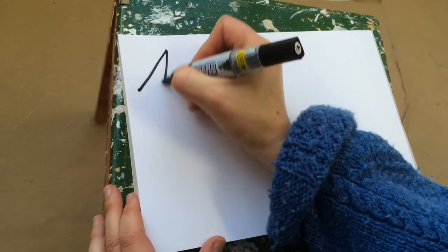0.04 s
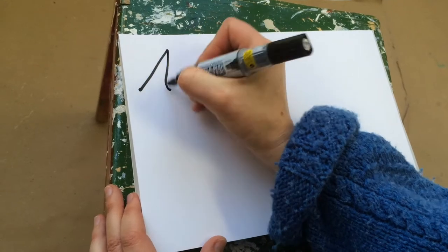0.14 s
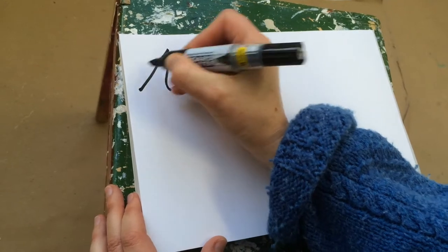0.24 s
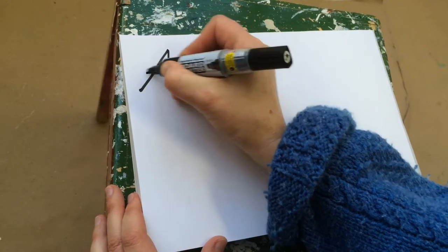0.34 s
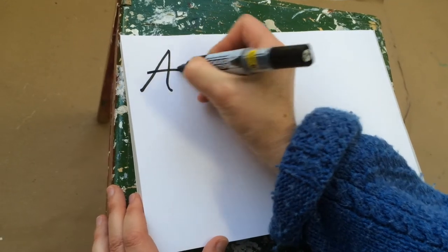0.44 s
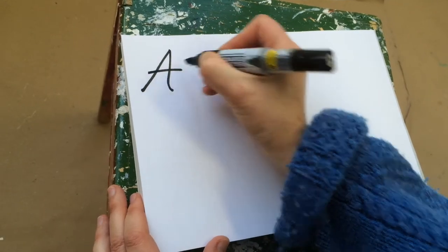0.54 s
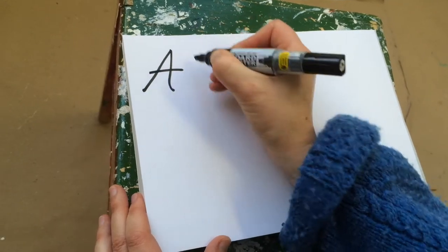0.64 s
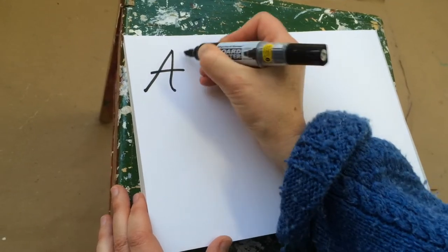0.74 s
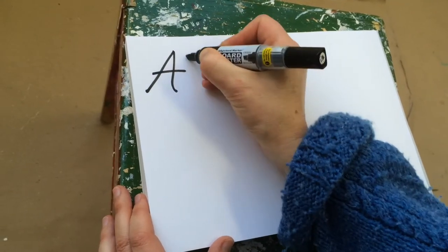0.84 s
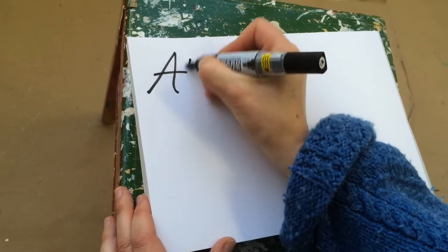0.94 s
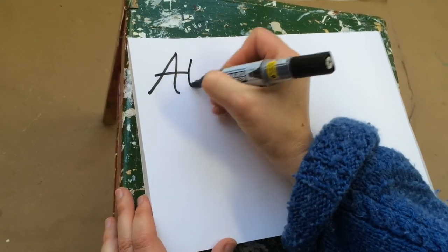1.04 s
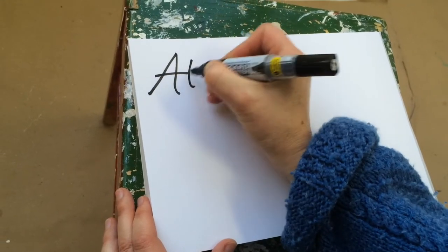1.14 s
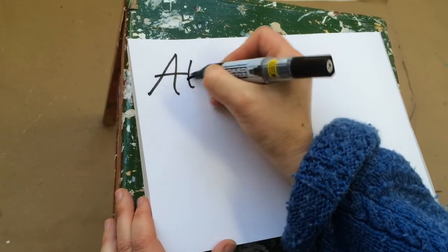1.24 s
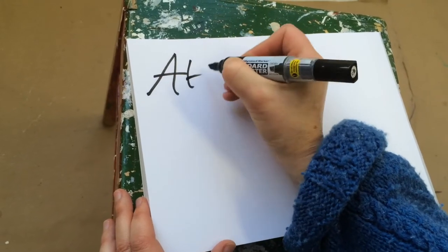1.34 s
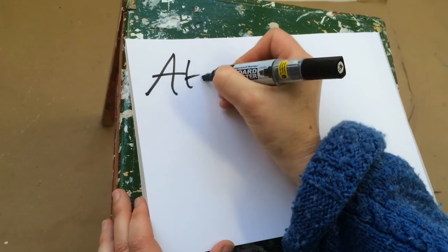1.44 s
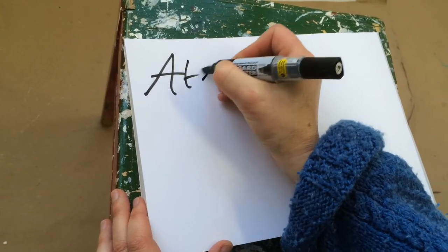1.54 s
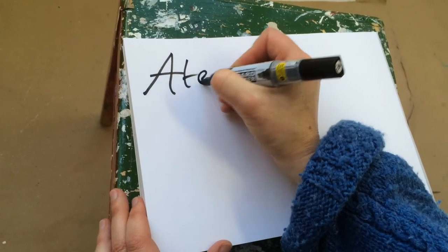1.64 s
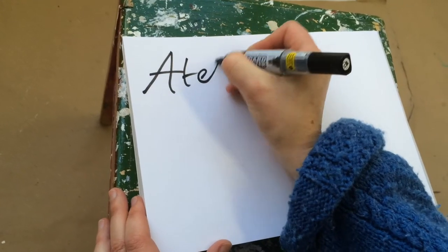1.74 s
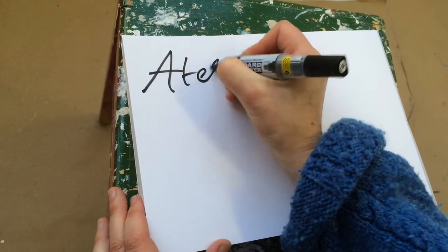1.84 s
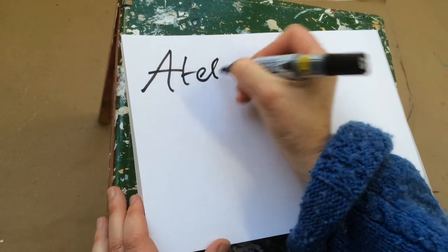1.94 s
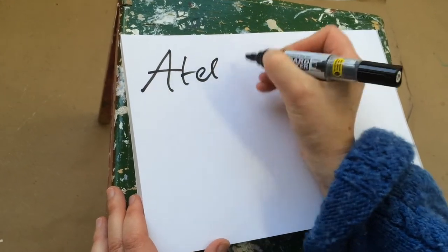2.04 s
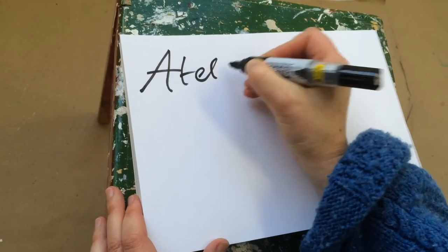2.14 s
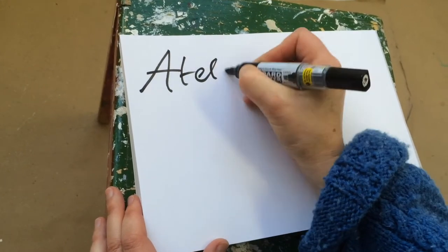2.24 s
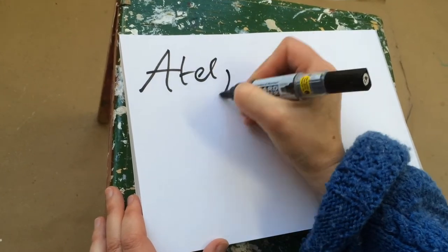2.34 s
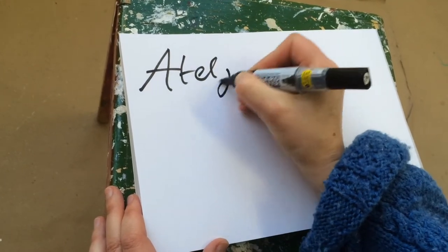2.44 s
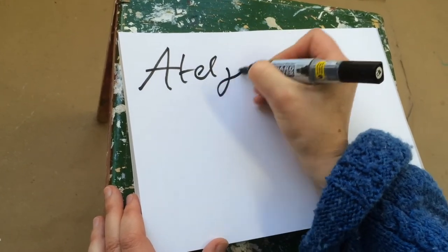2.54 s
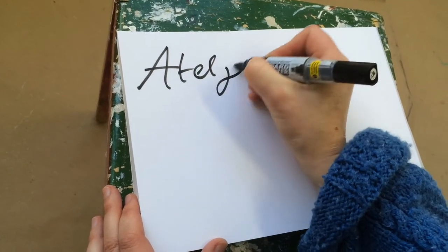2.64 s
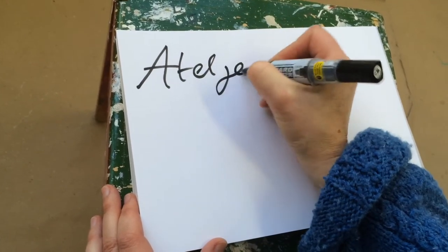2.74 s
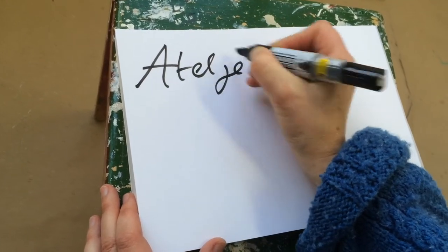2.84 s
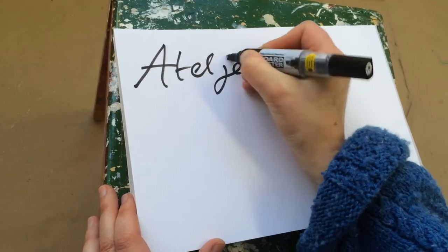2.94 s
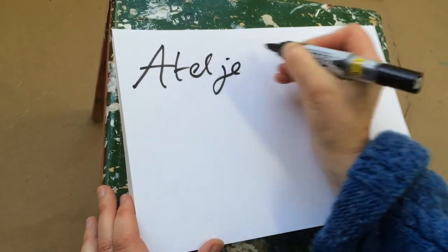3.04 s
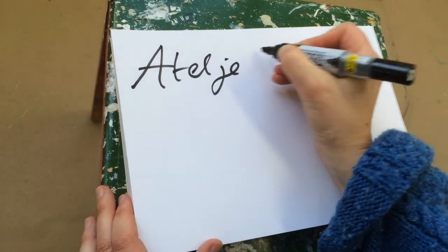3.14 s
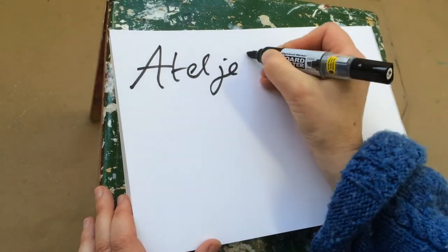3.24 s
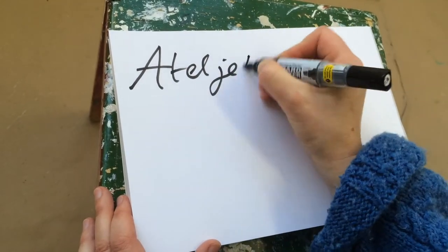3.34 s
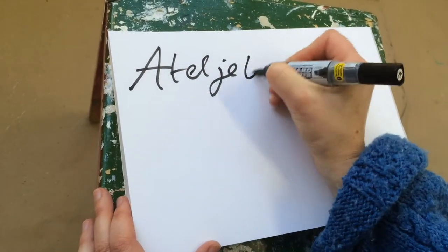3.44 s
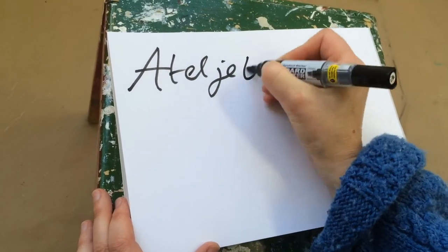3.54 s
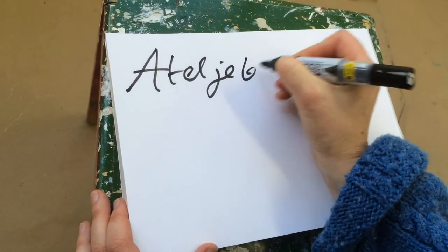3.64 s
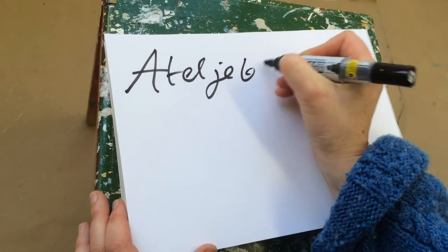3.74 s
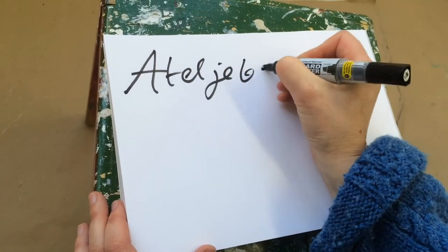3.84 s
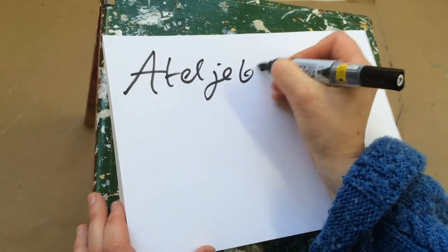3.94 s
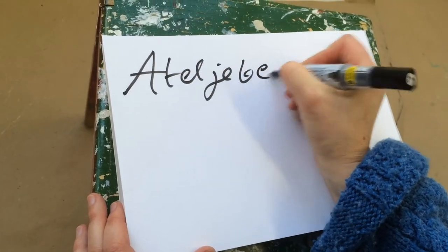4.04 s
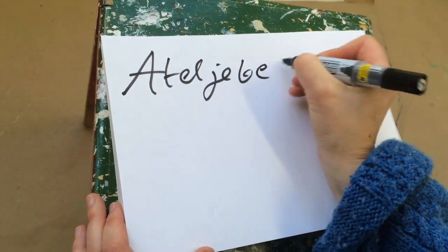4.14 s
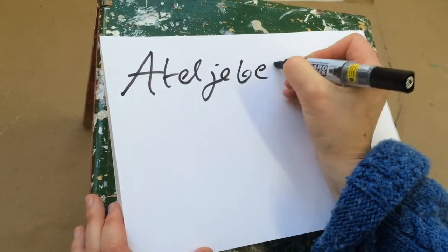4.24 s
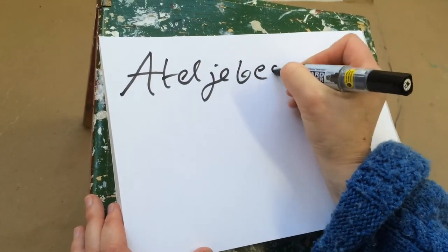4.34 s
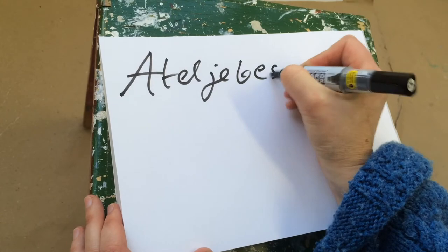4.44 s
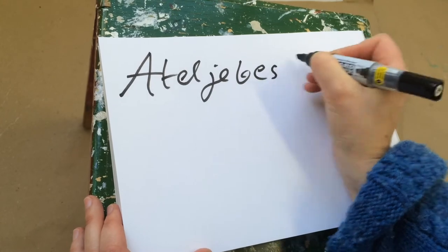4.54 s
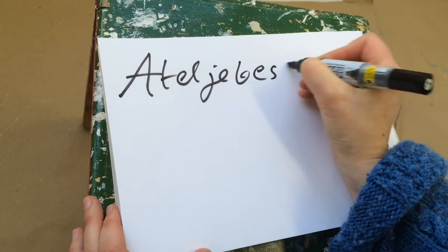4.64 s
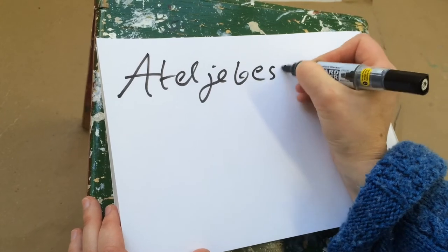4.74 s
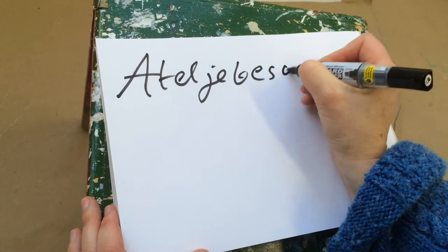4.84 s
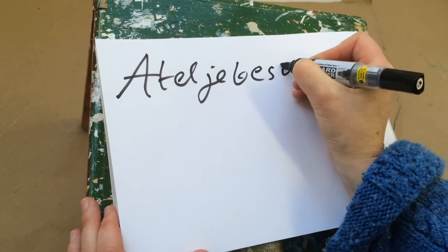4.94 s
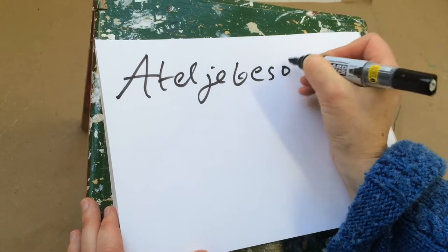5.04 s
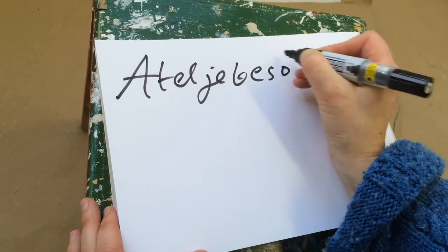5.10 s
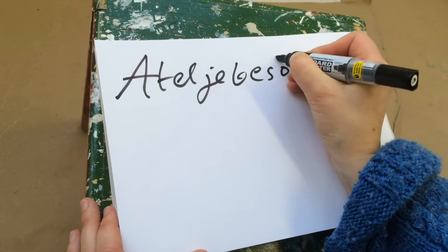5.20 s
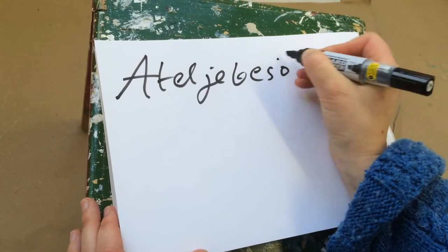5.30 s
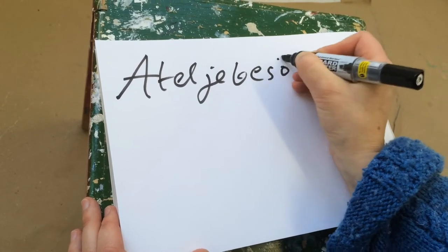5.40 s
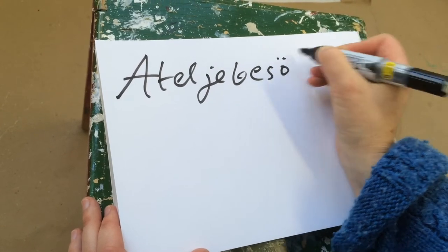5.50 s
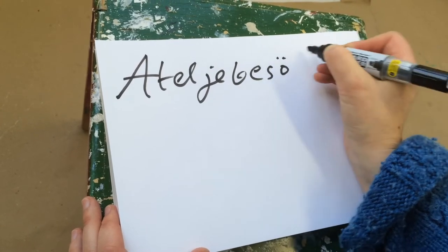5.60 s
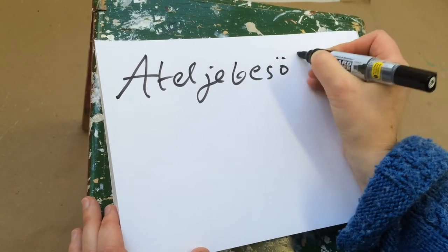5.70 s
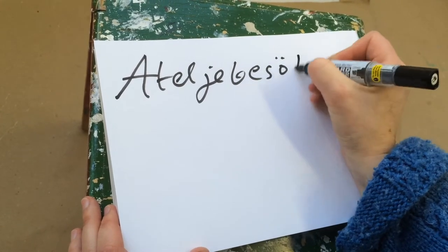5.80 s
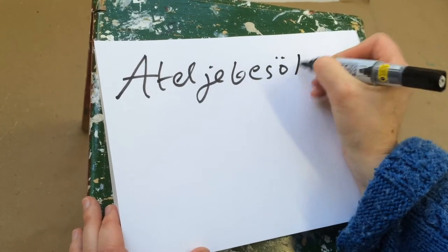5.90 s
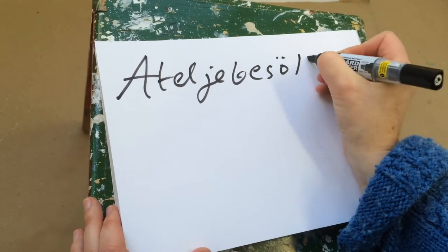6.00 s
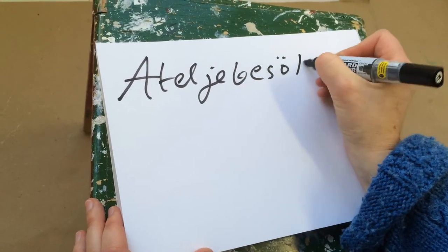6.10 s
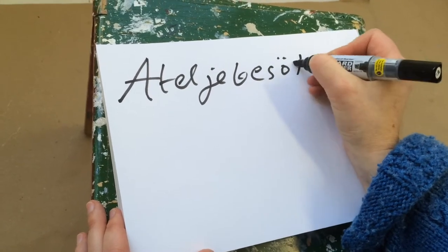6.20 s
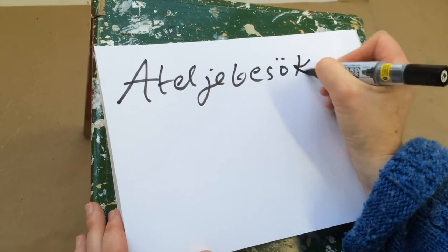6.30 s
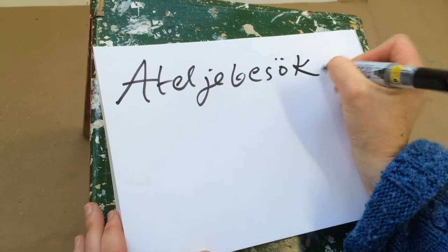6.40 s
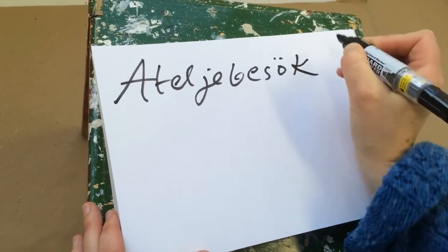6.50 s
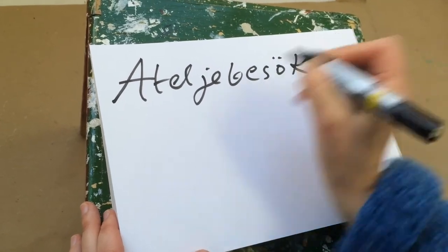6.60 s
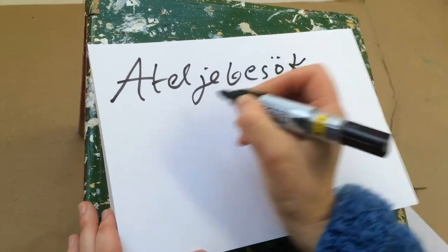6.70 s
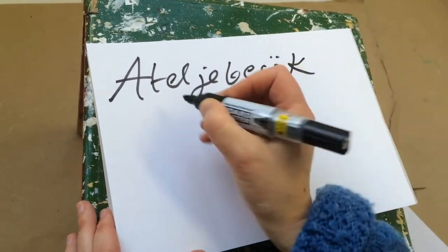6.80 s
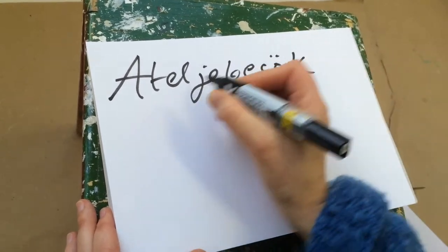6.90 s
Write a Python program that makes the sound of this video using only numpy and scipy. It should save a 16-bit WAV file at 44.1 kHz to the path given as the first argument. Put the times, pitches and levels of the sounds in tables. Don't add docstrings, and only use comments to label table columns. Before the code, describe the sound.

In a quiet room, a felt-tip marker writes letters one by one on paper laid over a hollow wooden board. Short, fluttering, squeaky scratches alternate with brief gaps where the hand brushes softly across the sheet. The tip lands with dull little knocks, the hardest near the middle, and the paper snaps now and then. The writing stops near the end, leaving faint ticks. Close small microphone, thin bass, slight room tail.

```python
import sys
import numpy as np
from scipy import signal
from scipy.fft import rfft, irfft
from scipy.io import wavfile

SR = 44100
rng = np.random.default_rng(int(sys.argv[2]) if len(sys.argv) > 2 else 0)


def undo_db(level):
    steps = np.asarray(level, float) / 20
    return 10 ** steps


def store_wav(level_fs):
    pcm = np.round(np.clip(np.atleast_2d(level_fs), -1, 1) * 32767)
    wavfile.write(sys.argv[1], SR, pcm.T.astype(np.int16))


N = 306936
CONTROL_STEP = 32


def rms_one(x):
    return x / np.sqrt(np.mean(x ** 2) + 1e-20)


def drift(rate):
    r = np.exp(-80 * np.pi * rate / SR)
    noise = rng.standard_normal(N // 40 + 2002)
    slow = signal.lfilter([1], [1, -2 * r, r * r], noise)[2000:]
    return np.interp(np.arange(N) / 40, np.arange(len(slow)), rms_one(slow))


def band(x, low_hz, high_hz):
    return signal.sosfilt(signal.butter(2, [low_hz, high_hz], "band", fs=SR, output="sos"), x)


def coloured(spectrum):
    hz, level_db = np.transpose(spectrum)
    grid = np.maximum(np.fft.rfftfreq(N, 1 / SR), 1)
    gain = undo_db(np.interp(np.log(grid), np.log(hz), level_db))
    return rms_one(irfft(rfft(rng.standard_normal(N)) * gain, N))


def resonate(x, hz, width_hz):
    r = np.exp(-np.pi * width_hz / SR)
    feedback = [1, -2 * r * np.cos(2 * np.pi * hz / SR), r * r]
    return signal.lfilter(np.array([1, 0, -1]) * (1 - r * r) / 2, feedback, x)


def smooth(coarse):
    return np.interp(np.arange(N) / CONTROL_STEP, np.arange(len(coarse)), coarse)


def swells(rows, steep=2):
    s, db, half_width, *extras = np.transpose(rows)[:, :, None]
    t = np.arange(0, N + CONTROL_STEP, CONTROL_STEP) / SR
    bells = undo_db(db) * np.exp(-np.abs((t - s) / half_width) ** steep) + 1e-9
    weight = bells ** 2
    return bells, *[smooth((weight * extra).sum(0) / weight.sum(0)) for extra in extras]


def still_air():
    # hz, level_db (per Hz)
    air_colour = [(15, -39), (25, -39), (55, -23), (82, 15), (156, -4), (378, 1), (741, -1), (1300, -3),
                  (4260, -12.5), (9550, -13), (15500, -15)]
    return undo_db(-69.5) * coloured(air_colour)


def board_rumble():
    # time_s, level_db
    weight = [(0.0, -69), (1.26, -69), (1.47, -62.5), (2.201, -69), (2.46, -64), (2.77, -67.5), (2.98, -62),
              (3.6, -68.5), (4.36, -66.5), (4.75, -71), (4.88, -66), (5.271, -74), (5.42, -55),
              (5.93, -65.5), (6.96, -73)]
    # hz, level_db (per Hz)
    rumble_colour = [(18, -52), (30, -6), (81, 0), (119, -12.5), (184, -10), (298, -16), (351, -12.5),
                     (625, -40), (800, -26.5), (1040, -41), (1760, -120)]
    level_db = np.interp(np.arange(N) / SR, *np.transpose(weight))
    return undo_db(level_db + 0.57 * drift(3.6)) * coloured(rumble_colour)


def tip_motion():
    # start_s, length_s
    contacts = [(.006, .24), (0.425, 0.15), (.996, .14), (1.297, 0.087), (1.511, 0.35), (1.864, .19),
                (2.318, .5), (3.019, 0.051), (3.381, 0.28), (3.577, 0.1), (3.889, 0.32), (4.256, 0.019),
                (4.312, 0.17), (4.712, 0.045), (4.776, 0.2246), (5.032, .046), (5.3, .008), (5.435, .029),
                (5.483, 0.019), (5.789, .19), (6.124, 0.17), (6.285, .17)]
    # time_s, scratch_db, half_width_s, slant_db, twist_db
    strokes = [(0.082, -44.5, 0.034, -1.9, -5), (0.144, -44.5, 0.033, -5.7, -4),
               (0.195, -58.5, 0.061, 1, -3), (0.446, -57.8, 0.02, 6, 0), (0.491, -49, 0.044, -4, -4),
               (0.517, -54.5, 0.029, -3, -7), (1.018, -47.5, 0.03, -1.5, 1),
               (1.025, -50.5, 0.094, -2.5, 0), (1.137, -65, 0.017, -7, 0), (1.309, -44, 0.027, 3, 1.5),
               (1.339, -52, 0.014, -14, -7), (1.882, -39.5, 0.031, 6, 2.5),
               (1.945, -51, 0.048, 0.2, -1), (2.015, -68.5, 0.091, -4, -4.5),
               (4.155, -64, 0.065, -1.5, -1), (5.845, -51, 0.052, -3.5, -2),
               (5.887, -58.5, 0.038, -6, 7), (6.128, -47.5, 0.036, 3, 6.5),
               (6.208, -45, 0.04, -1.5, 2.5), (6.355, -49, 0.053, -2.5, 0), (6.403, -47, 0.051, -4, 3),
               (6.438, -59, 0.009, 2, -3.5),
               (1.552, -45.5, 0.027, 0, 0), (1.649, -43, 0.039, 2, -1.5), (1.755, -44.5, 0.044, -2.6, 0),
             (1.837, -54.5, 0.024, -6, 4), (2.365, -50.5, 0.092, -0.8, 0), (2.438, -46, 0.038, 2.5, 1),
             (2.54, -45.5, 0.041, -5, -3), (2.616, -43.4, 0.038, -2.5, -0.5), (2.714, -43, 0.015, 2, 2.5),
             (2.765, -48, 0.14, 2, 1), (3.39, -51.5, 0.025, -2.3, 4), (3.43, -47.5, 0.026, -6, 0),
             (3.514, -43.5, 0.032, -5, 0), (3.611, -46, 0.026, -2, 6.5), (3.7, -47.5, 0.035, 0, 3.5),
             (3.934, -44.5, 0.025, 2.5, 4), (4.021, -44.5, 0.036, 0.4, 1.5), (4.096, -48.5, 0.024, -4, 0),
             (4.345, -51, 0.031, 7, 2.5), (4.418, -54, 0.063, 0, -2), (4.491, -44.5, 0.015, 1.7, 4),
             (4.78, -47, 0.058, 0.8, 0.5), (4.89, -42.5, 0.024, -1.4, -1.5), (5.004, -42, 0.064, 5.5, 0)]
    # time_s, scratch_db, half_width_s, slant_db, twist_db
    dabs = [
        (0.022, -64, 0.036, 14, -2),
        (3.022, -49, 0.011, -2, -2.5),
        (4.267, -51.5, 0.01, 6, -1.5),
        (4.721, -50, 0.014, 8, -4),
        (4.752, -59, 0.014, 21, -8),
        (5.056, -51.5, 0.0084, -26, -9),
        (5.308, -62, 0.0086, 2.5, 2),
        (5.439, -43.5, 0.0058, 15.5, 5.5),
        (5.5, -55, 0.01, -0.5, 2),
    ]
    break_loose_s, lift_s = 0.0057, 0.0039
    rows = strokes + dabs
    bells, slant_db, twist_db = swells(rows)
    start, length = np.transpose(contacts)[:, :, None]
    since = np.arange(bells.shape[1]) * CONTROL_STEP / SR - start
    touch = np.clip(since / break_loose_s, 0, 1) * np.exp(-np.maximum(since - length, 0) / lift_s)
    owner = np.searchsorted(start[:, 0] - .015, np.array(rows)[:, 0]) - 1
    return smooth((bells * touch[owner]).sum(0)), slant_db, twist_db


def slips(per_s, spread_db):
    sizes = undo_db(spread_db * np.minimum(rng.exponential(1, N), 4)) * rng.choice([-1, 1], N)
    return rms_one(sizes * (rng.random(N) < per_s / SR))


def body(drive, modes, wander_db, lean_db=0):
    lowest_hz = modes[0][0]
    shares = np.array([undo_db(db + wander_db * drift(8.7) - lean_db * np.log2(hz / lowest_hz))
                       for hz, width, db in modes])
    energy = sum(share ** 2 * width for share, (hz, width, db) in zip(shares, modes))
    shares = shares / np.sqrt(energy)
    out = np.zeros(N)
    for k, (hz, width, db) in enumerate(modes):
        out += (-1) ** k * shares[k] * resonate(drive, hz, width)
    return rms_one(out)


def hand_echo(x):
    echo_gain = .3
    lag = SR * (.00022 + .00004 * drift(2.5))
    echo = np.interp(np.arange(N) - lag, np.arange(N), x)
    return (x + echo_gain * echo) / np.sqrt(1 + echo_gain ** 2)


def marker():
    # pitch_hz, width_hz, level_db
    barrel_low = [(1000, 190, -6), (1294, 200, 1.5), (1600, 210, -2), (1952, 192, 0.5)]
    barrel_upper = [(2305, 466, -2.5), (2950, 470, -1.5), (3430, 240, 0), (3860, 343, -3)]
    barrel_mid = [(4510, 510, -2.5), (5090, 570, 2.5), (6400, 1220, -3.5)]
    tip_high = [(7090, 880, -8.5), (7850, 510, -0.5), (9230, 680, -2), (10200, 760, -1.5), (11150, 980, -5),
                (12300, 1340, -8.5), (14800, 1300, -7.5)]
    # pitch_hz, width_hz, level_db
    board_scrape = [(350, 46, 6), (513, 146, 3.5)]
    brisk_db, slowest_db = -44, -14.5

    gain, slant_db, twist_db = tip_motion()
    speed_db = np.maximum(20 * np.log10(gain + 1e-9) - brisk_db, slowest_db)

    def group_gain(when_brisk_db, per_speed_db, slant, twist, db_per_s):
        angle_db = slant * slant_db + twist * twist_db
        return undo_db(when_brisk_db + per_speed_db * speed_db + angle_db + db_per_s * np.arange(N) / SR)

    low = group_gain(-13.5, per_speed_db=-0.7, slant=1.256, twist=-0.5, db_per_s=1.43)
    upper = group_gain(0.89, per_speed_db=-0.17, slant=0.59, twist=0.34, db_per_s=-0.17)
    bright = group_gain(5, per_speed_db=0.27, slant=-0.24, twist=0.34, db_per_s=-0.7)

    drive = slips(per_s=14000, spread_db=2.2) * undo_db(.7 * drift(40.0))
    tones = low * body(band(drive, 660, 2470), barrel_low, wander_db=2.9, lean_db=-.5 * twist_db)
    upper_lean_db = 1.0 * slant_db + 0.82 * twist_db
    tones = tones + upper * body(band(drive, 1670, 5460), barrel_upper, wander_db=2.1, lean_db=upper_lean_db)
    mid_lean_db = 0.13 * slant_db + 0.41 * twist_db
    tones = tones + body(band(drive, 3200, 7600), barrel_mid, wander_db=2.4, lean_db=mid_lean_db)
    tip_lean_db = 0.95 * twist_db + 0.29 * slant_db
    tones = tones - bright * body(band(drive, 4500, 13400), tip_high, wander_db=1.17, lean_db=tip_lean_db)
    tones = tones - 0.077 * resonate(tones, 11300, 410)
    tones = tones + undo_db(-10.5) * low * body(band(drive, 140, 1800), board_scrape, wander_db=1.5)
    return gain * hand_echo(tones) / np.sqrt(1 + upper ** 2 + bright ** 2)


def hand():
    # time_s, level_db, half_width_s, low_part_db
    slides = [(.3, -69.5, .07, -30), (.65, -66.5, 0.057, -3), (.76, -65.5, .04, -22.5),
              (1.17, -77, 0.12, -20), (1.41, -72, 0.097, -4), (2.09, -66, 0.072, -2.5),
              (2.86, -69.5, 0.048, -2), (3.09, -60.5, 0.043, -10), (3.15, -60, 0.038, -7),
              (3.26, -70, 0.031, -22), (3.73, -68.5, 0.045, -20), (4.575, -59.5, 0.079, -4),
              (5.12, -86.5, 0.11, 10), (5.6, -62, 0.07, -3.5), (5.98, -74, 0.057, -2),
              (6.5, -69, 0.065, 1.5), (6.74, -83, 0.09, 8), (6.927, -63, 0.0046, -31),
              (6.955, -66, 0.036, -26)]
    # hz, level_db (per Hz)
    slide_colour = [(300, -30), (600, -6), (1200, 0), (3000, -1), (5000, -3), (9000, -4), (15500, -8)]
    bells, low_db = swells(slides, steep=2.2)
    hiss = coloured(slide_colour) * undo_db(0.81 * drift(45.0))
    low = signal.lfilter(*signal.butter(1, 2200, fs=SR), hiss)
    return smooth(bells.sum(0)) * (rms_one(hiss - low) + undo_db(low_db + 2.0) * rms_one(low))


def strike(times, blow_db, modes, luck_db):
    at, out = (times * SR).astype(int), np.zeros(N)
    luck = rng.normal(0, 1, (len(at), len(modes)))
    for k, (hz, level_db, t60) in enumerate(modes):
        clicks = np.full(N, 1e-18)
        clicks[at] = undo_db(blow_db + level_db + luck_db * luck[:, k])
        r, w = undo_db(-60 / (t60 * SR)), 2 * np.pi * hz / SR
        out += signal.lfilter([0, np.sin(w)], [1, -2 * r * np.cos(w), r * r], clicks)
    return out


def snaps(times, peak_db, decay_s, low_hz):
    clicks = np.full(N, 1e-18)
    clicks[(np.array(times) * SR).astype(int)] = undo_db(peak_db)
    shape = signal.lfilter([1], [1, -np.exp(-1 / (decay_s * SR))], clicks)
    return shape * rms_one(band(rng.standard_normal(N), low_hz, 15000))


def thumps():
    # time_s, push_db, knock_db, paper_tick_db
    blows = [(0.4135, -49.5, -58.5, -69), (1.259, -45, -60.5, -62), (1.277, -46, -70, -71),
             (2.2548, -42.5, -47.5, -58), (2.966, -48, -80, -85), (2.9743, -33, -35, -56),
             (3.2984, -42, -55.5, -62), (3.847, -44, -64.5, -69), (4.259, -55.5, -75, -67),
             (4.711, -54, -62, -75), (5.2211, -40, -39, -59.5), (5.43, -41.5, -43, -56),
             (5.4393, -55, -58, -72), (5.742, -56, -47.5, -55), (6.051, -69, -58.5, -79)]
    # pitch_hz, level_db, t60_s
    push_modes = [(113.3, 4.5, 0.05)]
    # pitch_hz, level_db, t60_s
    knock_modes = [(353, -0.5, 0.031), (503, -4, 0.028), (540, -12.5, 0.017), (830, -15, 0.026),
                   (1180, -3, 0.012), (1600, -9, 0.011)]
    # pitch_hz, level_db, t60_s
    board_low = [(74.7, -16.5, 1.0), (100.8, -14, 0.57), (152.4, -20, 0.46), (187.7, -17, 0.77),
                 (228.6, -16, 0.23)]
    # pitch_hz, level_db, t60_s
    board_high = [(282, -14.5, 0.3), (349, -32, 0.3), (410, -9, 0.1), (519, -23, 0.32)]
    bounce_s, bounce_gain = 0.002725, 0.43
    contact_s = 0.00055

    s, push_db, knock_db, tick_db = np.transpose(blows)
    both_db = 10 * np.log10(undo_db(push_db) ** 2 + undo_db(knock_db) ** 2)
    knock = -strike(s, knock_db, knock_modes, luck_db=0)
    knock = knock - bounce_gain * strike(s + bounce_s, knock_db, knock_modes, luck_db=1.5)
    knock = undo_db(-4) * knock + undo_db(6.5) * resonate(knock, 392, 200)
    hit = knock + strike(s + .0015, push_db, push_modes, luck_db=0)
    hit = hit + strike(s + 0.0042, both_db, board_low, luck_db=0)
    hit = hit + strike(s + 0.00594, knock_db, board_high, luck_db=6.5)
    felt = np.hanning(int(contact_s * SR) + 3)
    softened = signal.lfilter(felt / felt.sum(), [1], hit)
    return softened + snaps(s + 0.00075, tick_db, decay_s=0.002, low_hz=900)


def paper_ticks():
    # time_s, peak_db
    ticks = [
        (0.9044, -60),
        (1.0016, -30),
        (2.911, -51),
        (4.778, -52),
        (4.9944, -47.5),
        (5.0002, -55),
        (6.1283, -37),
        (6.787, -45),
        (6.8534, -49.5),
        (6.898, -55),
    ]
    s, peak_db = np.transpose(ticks)
    return snaps(s, peak_db - 10, decay_s=.0018, low_hz=3000)


def room(x):
    t60_s = 0.92
    t = np.arange(SR) / SR
    noise = rng.standard_normal((2, SR)) * (t > .008)
    bass = band(noise[0], 61, 470) * undo_db(-60 * t / t60_s)
    treble = band(noise[1], 550, 4000) * undo_db(-60 * t / (0.5 * t60_s))
    tail = bass + undo_db(-4) * treble
    return signal.fftconvolve(x, rms_one(tail) / np.sqrt(SR))[:N]


def scene():
    near = marker() + hand() + thumps() + paper_ticks()
    return (near + undo_db(-19) * room(near) + board_rumble() + still_air())[None]


def low_pass(x):
    return signal.sosfilt(signal.butter(12, 15890, fs=SR, output="sos"), x)


def record(dry):
    thin = signal.sosfilt(signal.butter(2, 60, "high", fs=SR, output="sos"), dry)
    cut = signal.sosfilt(signal.ellip(10, .5, 70, 15390, fs=SR, output="sos"), thin)
    return low_pass(cut)


dry = scene()
out = record(dry)
store_wav(out)
```